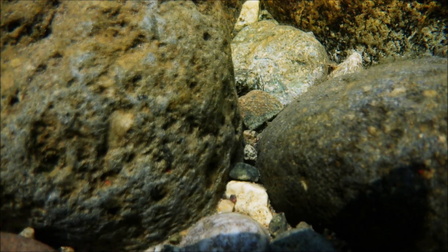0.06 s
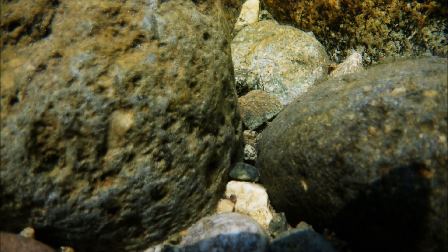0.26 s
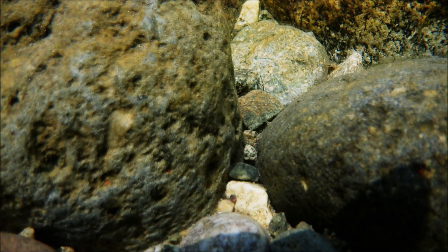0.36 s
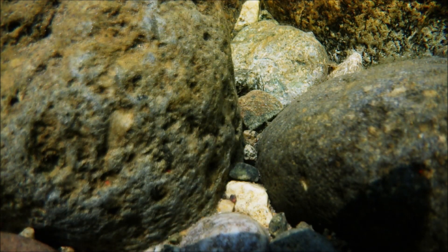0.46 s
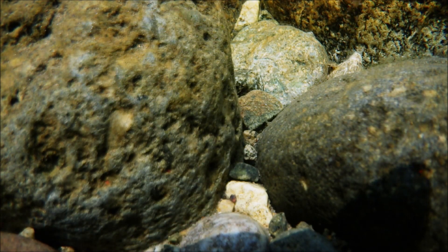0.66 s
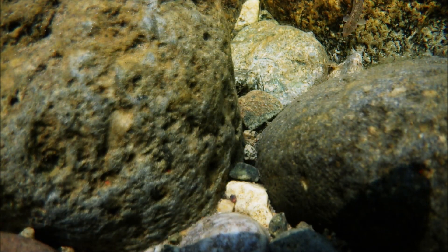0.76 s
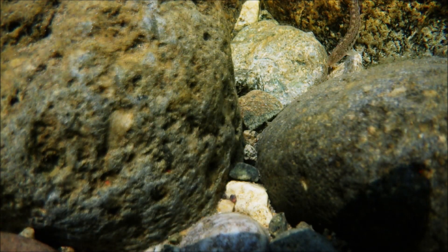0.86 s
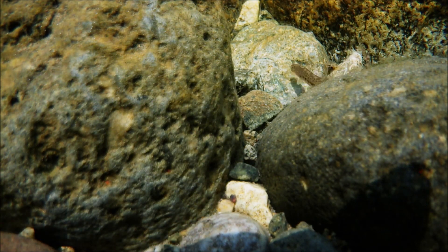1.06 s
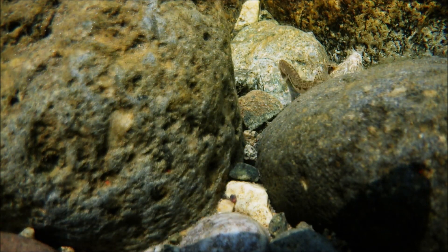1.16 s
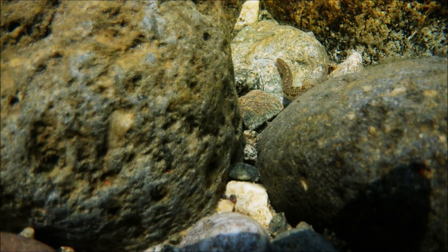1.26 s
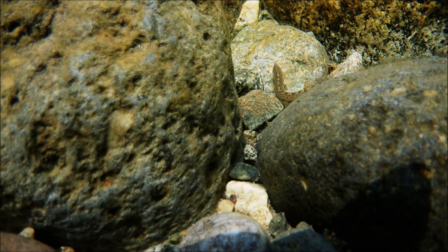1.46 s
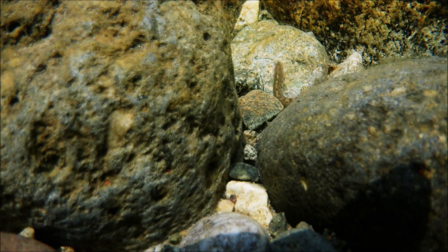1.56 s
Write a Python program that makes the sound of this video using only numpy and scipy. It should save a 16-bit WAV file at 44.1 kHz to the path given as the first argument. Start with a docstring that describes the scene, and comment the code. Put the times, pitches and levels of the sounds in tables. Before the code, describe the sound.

Stream water heard from under the surface: a steady, low, muffled rush with soft, short gurgles throughout. At about 0.2 seconds a stone gives a firm, hollow, dull bump; from 0.5 to 0.6 seconds stones rock in a quick, softer clatter. Around 0.8 seconds everything becomes a little quieter, and the flow continues, fading slightly to about 1.6 seconds. Faint camera hiss and a barely audible high whine lie over it.

```python
"""In the bed of a stony stream, heard from a camera held under water, close to the flow.
The rush is low, shaped noise that slowly fades; soft gurgles are short, damped tones.
Stones knock dully twice, a firm bump and then a short rocking clatter: damped tones with a little grit.
The camera's own noise hiss and a faint sine whine lie on top; halfway through, the whole level steps down."""
import sys
import numpy as np
from scipy import signal
from scipy.fft import rfft, irfft, next_fast_len
from scipy.io import wavfile
from scipy.ndimage import map_coordinates

SR = 44100
rng = np.random.default_rng(int(sys.argv[2]) if len(sys.argv) > 2 else 0)


def transcribe(u):
    """Save the signal u as a 16-bit wav file named by the first command-line argument.

    u: samples, shape (n,) or (channels, n), limited to [-1, 1]; the rate is SR.
    q: integer samples, one column per channel.
    """
    v = np.clip(np.atleast_2d(u).T, -1, 1)
    q = np.round(v * 32767).astype(np.int16)
    wavfile.write(sys.argv[1], SR, q)


N = 70560  # samples, 1.6 s

# Spectrum of the rushing water. Each row: frequency in Hz, relative density in dB per Hz.
RUSH_SPECTRUM = [(20, -20), (42, -23), (80, -19), (140, -13), (185, -8), (250, 2), (340, -1), (470, -2.5),
                 (600, -9.5), (720, -18.5), (900, -17), (1100, -20.5), (1800, -23.5), (3500, -34.5),
                 (8000, -57)]
# How alike the rush is on both sides. Each row: frequency in Hz, left-right correlation (1 = identical).
RUSH_LIKENESS = [(60, 1), (200, 0.89), (380, 0.92), (540, 0.8), (720, 0.26), (1200, 0.0046), (2400, -0.023)]
# Side the rush leans to. Each row: frequency in Hz, left minus right in dB.
RUSH_BALANCE = [(60, -7.5), (200, 1), (400, -2.5), (700, 0.7), (1300, -4), (3000, -2)]
RUSH_DB, RUSH_FADE_DB_PER_S = -44.5, 0.6
SURGE_DB, FLUTTER_DB = -0.55, 0.4  # depth of the slow and the quick level wobble

# The gurgles that stand out. Each row: start in seconds, level in dB, pitch in Hz.
STRONG_GURGLES = [(0.077, -39, 296), (0.104, -34.5, 379), (0.688, -38.5, 318), (0.709, -37, 320),
                  (.779, -38, 288), (1.087, -34, 338), (1.258, -39, 258), (1.476, -37, 450),
                  (1.566, -34.5, 277)]
GURGLES_PER_S, GURGLE_DB, GURGLE_SCATTER_DB = 45, -47, 1.5  # the faint ones
GURGLE_HZ, GURGLE_LOG_SPREAD = 334.7, 0.292
GURGLE_CYCLES = 1.57  # cycles to swell

# Stone contacts. Each row: start in seconds, level in dB, pitch in Hz, time to swell in seconds,
# low thud in dB against the hollow tone, clack in dB against the hollow tone.
STONE_CONTACTS = [(.203, -29, 267, 0.0072, -7.5, -30), (0.2167, -19, 251, 0.01, -4, -20.5),
                  (.484, -29.5, 304, 0.0048, -24, -16.5), (0.499, -31, 240, 0.0061, -26, -20),
                  (.516, -35, 231, 0.0055, -10, -21), (0.5258, -25.5, 217, 0.0066, -14, -10),
                  (.550, -27, 293, 0.0057, -16.5, -30), (.576, -25.5, 308, 0.0062, -24, -39)]
# Upper modes of the stones. Each row: frequency in Hz, level within the clack in dB, time to swell in seconds.
CLACK_MODES = [(448.7, 1, 0.0099), (937, -10.5, 0.0042)]
# Spectrum of stone rubbing on stone. Each row: frequency in Hz, relative density in dB per Hz.
GRIT_SPECTRUM = [(300, -30), (650, -5), (950, -1), (1200, -9), (2000, -20), (5000, -50)]
THUD_HZ, THUD_SWELL_S = 143, 0.0048
GRIT_DB, GRIT_SWELL_S = -16, 0.006  # level within the clack
KNOCK_PAN_DB, CLACK_PAN_DB = -0.7, -1.5  # left minus right; the clack gets both

# Spectrum of the camera's hiss. Each row: frequency in Hz, relative density in dB per Hz.
HISS_SPECTRUM = [(100, 0), (1000, -0.5), (2500, -0.5), (4500, -3), (7000, -2.05), (11000, -0.5),
                 (14500, -1.5), (15300, -7), (15800, -30.5)]
HISS_DB, HISS_PAN_DB = -57.5, -1.5  # pan is left minus right
WHINE_HZ, WHINE_DB = 11327, -73

SWELL_POWER = 2.6  # higher = rounder rise and shorter tail
STEP_S, STEP_LENGTH_S, STEP_DB = 0.802, 0.03, -3
LOW_CUT_HZ, TOP_HZ = 91, 15800


def rush():
    """Turbulent flow all round the microphone: alike on both sides in the bass, diffuse above."""
    def mid_side_gains(hz):
        # mid cos, side sin: the left-right correlation is the cosine of twice the angle
        angle = np.arccos(np.clip(along(RUSH_LIKENESS, hz), -1, 1)) / 2
        return amp(along(RUSH_SPECTRUM, hz)) * [np.cos(angle), np.sin(angle)]

    mid, side = filtered(rng.standard_normal((2, N)), mid_side_gains)
    left_right = np.array([mid + side, mid - side])
    flow = unit(filtered(left_right, lambda hz: pan(along(RUSH_BALANCE, hz))))
    fade_db = RUSH_FADE_DB_PER_S * np.arange(N) / SR
    wobble_db = SURGE_DB * wobble(rate=7.8) + FLUTTER_DB * wobble(rate=50)
    return flow * amp(RUSH_DB - fade_db + wobble_db)


def gurgles():
    """Short low blips of eddies and bubbles: many faint ones at chance times and a few that stand out."""
    out = np.zeros(N)
    times = np.cumsum(rng.exponential(1 / GURGLES_PER_S, 300))
    times = times[times < N / SR]
    levels_db = GURGLE_DB + GURGLE_SCATTER_DB * rng.standard_normal(len(times))
    pitches = GURGLE_HZ * np.exp(GURGLE_LOG_SPREAD * rng.standard_normal(len(times)))
    faint = list(zip(times, levels_db, pitches))
    for s, db, hz in faint + list(STRONG_GURGLES):
        add(out, s, amp(db) * ring(hz, GURGLE_CYCLES / hz))
    return out


def stones():
    """Each contact gives a hollow tone over a low thud, with a clack of upper modes and a little grit."""
    out = np.zeros((2, N))
    modes = sum(amp(db) * ring(hz, swell_s) for hz, db, swell_s in CLACK_MODES)
    rub = amp(GRIT_DB) * swell(GRIT_SWELL_S)
    for s, db, hz, swell_s, thud_db, clack_db in STONE_CONTACTS:
        noise = rng.standard_normal((2, N))
        grit = unit(filtered(noise, lambda f: amp(along(GRIT_SPECTRUM, f))))[:, :len(rub)]
        clack = (modes + rub * grit) * pan(CLACK_PAN_DB)
        thud = ring(THUD_HZ, THUD_SWELL_S)
        blow = ring(hz, swell_s) + amp(thud_db) * thud + amp(clack_db) * clack
        add(out, s, amp(db) * blow * pan(KNOCK_PAN_DB))
    return out


def camera_noise():
    """Noise hiss, unrelated left and right, and a thin electronic sine whine on the right."""
    hiss = unit(filtered(rng.standard_normal((2, N)), lambda hz: amp(along(HISS_SPECTRUM, hz))))
    whine = np.sin(2 * np.pi * WHINE_HZ * np.arange(N) / SR)
    right_only = np.array([np.zeros(N), whine])
    return amp(HISS_DB) * hiss * pan(HISS_PAN_DB) + amp(WHINE_DB) * right_only


def ring(hz, swell_s):
    """A dull tone of a few cycles."""
    envelope = swell(swell_s)
    return envelope * np.sin(2 * np.pi * hz * np.arange(len(envelope)) / SR)


def swell(swell_s):
    """Envelope of a water-damped sound: it swells to 1 in swell_s and soon dies, 0.1 s in all."""
    u = np.arange(SR // 10) / SR / swell_s
    return (u * np.exp(1 - u)) ** SWELL_POWER


def wobble(rate):
    """A smooth random curve, rate knots a second."""
    knots = rng.standard_normal(256)
    return map_coordinates(knots, [np.arange(N) * rate / SR], mode="wrap")


def filtered(x, response):
    """x with its spectrum multiplied by a response of frequency."""
    m = next_fast_len(N + SR // 2)  # half a second of spare room
    spectrum = rfft(x, m) * response(np.fft.rfftfreq(m, 1 / SR))
    return irfft(spectrum, m)[..., :N]


def along(points, hz):
    """Values read between (Hz, value) points on a log frequency axis."""
    f, v = np.transpose(points)
    return np.interp(np.log(hz + 1), np.log(f + 1), v)


def amp(db):
    """Decibels to an amplitude factor."""
    return 10 ** (np.asarray(db) / 20)


def unit(x):
    """x scaled to an RMS of 1."""
    return x / np.sqrt(np.mean(x ** 2) + 1e-20)


def pan(db):
    """Left and right gains for a level difference, left minus right."""
    return amp(np.array([[0.5], [-0.5]]) * db)


def add(track, s, sound):
    """Mix a sound into the track at time s, cut off at the end."""
    part = track[..., round(s * SR):][..., :sound.shape[-1]]
    part += sound[..., :part.shape[-1]]


def scene():
    """Water, stones and the camera's noise."""
    return rush() + gurgles() + stones() + camera_noise()


def record(dry):
    """The microphone loses the deepest bass, the level steps down once, and a band limit cuts the top."""
    low_cut = signal.butter(2, LOW_CUT_HZ, "highpass", fs=SR, output="sos")
    thin = signal.sosfilt(low_cut, dry)
    step = np.clip((np.arange(N) / SR - STEP_S) / STEP_LENGTH_S, 0, 1)
    return filtered(thin * amp(STEP_DB * step), lambda hz: hz < TOP_HZ)


dry = scene()
out = record(dry)
transcribe(out)
```